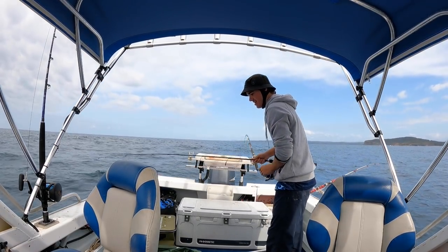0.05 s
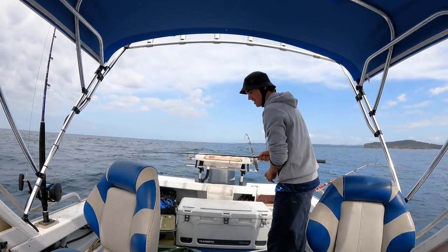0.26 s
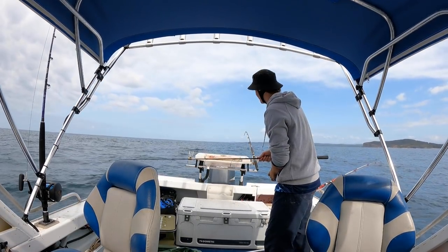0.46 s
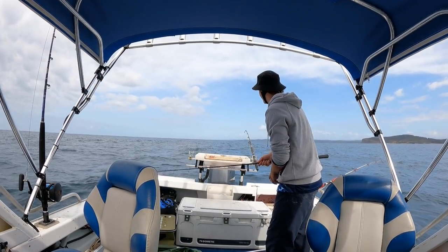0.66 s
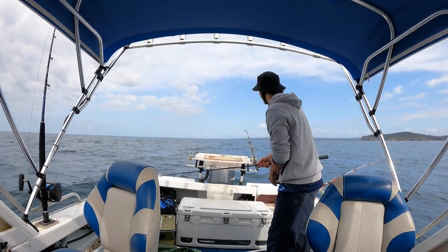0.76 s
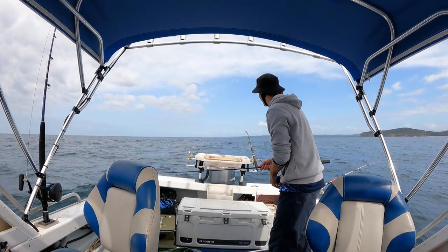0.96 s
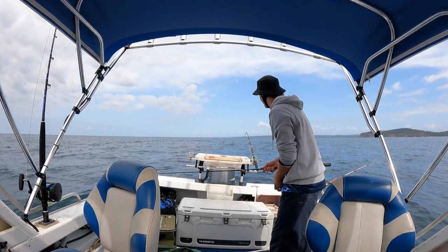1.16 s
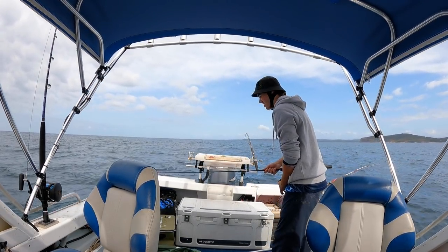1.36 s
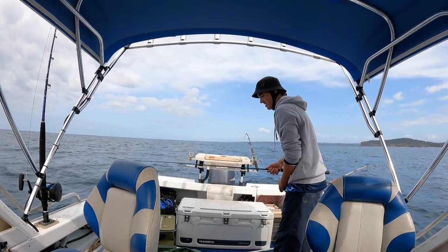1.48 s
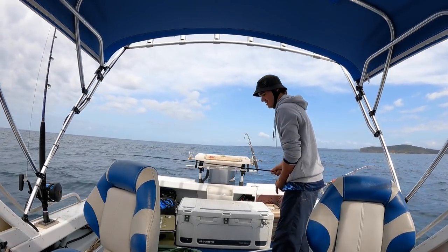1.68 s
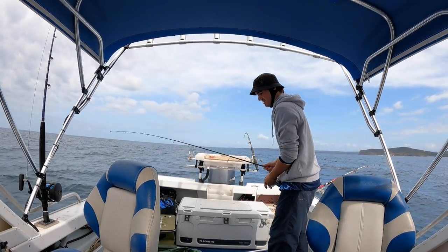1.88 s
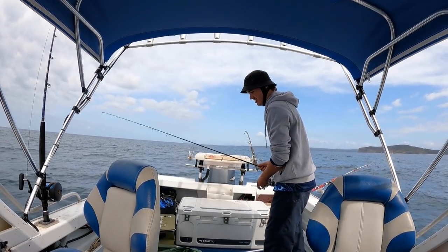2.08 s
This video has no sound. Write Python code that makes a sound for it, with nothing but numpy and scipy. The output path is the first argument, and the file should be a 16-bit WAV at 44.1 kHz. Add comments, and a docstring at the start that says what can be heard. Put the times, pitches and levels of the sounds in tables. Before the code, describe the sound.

A caught fish flaps in a small boat, booming hull thumps with quick irregular knocks and slaps

```python
"""Water laps, mutters and fizzes round the hull of a small open boat throughout, as shaped noise.
From the start a caught fish, a little left of a camera fixed to the hull, thumps the hull, which booms
with a falling pitch (swept sines), and its tail knocks the deck boards (modes, rattle and a pop).
Wet slaps (hiss and droplet tones) join at 0.2 s; the body slides over the boards at 1.08 s (swept
noise bands) and a small metal fitting ticks at 1.47 s (ringing noise); thumps and slaps go on to 2.1 s."""
import sys
import numpy as np
from scipy import signal
from scipy.fft import rfft, irfft
from scipy.io import wavfile
from scipy.ndimage import uniform_filter1d

SR = 44100
rng = np.random.default_rng(int(sys.argv[2]) if len(sys.argv) > 2 else 0)


def rack_gain(trim_db):
    """Turn a fader trim in dB into the linear factor to multiply a signal by."""
    fader = np.asarray(trim_db, float)
    return 10 ** (fader / 20)


def waveform_to_disk(signal):
    """Save audio, clipped to [-1, 1], as 16-bit WAV at the path in sys.argv[1]."""
    frames = np.transpose(np.atleast_2d(signal))
    scaled = np.clip(frames, -1, 1) * 32767
    samples = np.round(scaled).astype(np.int16)
    wavfile.write(sys.argv[1], SR, samples)


N = 94065
T = np.arange(N) / SR
FISH_PAN_DB, WATER_PAN_DB = 2, 1.4  # left over right


def spectrum_gain(points):
    """Spectral envelope: (f/Hz, level/dB) points joined by lines over log frequency."""
    f, p = np.fft.rfftfreq(N, 1 / SR) + 1, np.array(points, float)
    return rack_gain(np.interp(np.log(f), np.log(p[:, 0]), p[:, 1]))


def shape(x, points, lo=0., hi=SR):
    """Linear filtering: colours a signal, limits it softly to lo..hi Hz and scales it to rms 1."""
    f = np.fft.rfftfreq(N, 1 / SR) + 1
    skirts = np.sqrt((1 + (lo / f) ** 6) * (1 + (f / hi) ** 6))
    y = irfft(rfft(x) * spectrum_gain(points) / skirts, N)
    return y / np.sqrt(np.mean(y ** 2))


# stereo width against frequency: f/Hz, side minus mid level/dB
WIDTH = [(60, -27.5), (180, -24), (300, -10.5), (520, -13.5), (900, -7), (1550, -9), (2660, -5.5),
         (4570, -8), (7850, -6.5)]


def wide(make):
    """Decorrelation: unrelated mid and side draws, with the bass nearly alike left and right."""
    mid = make()
    side = irfft(rfft(make()) * spectrum_gain(WIDTH), N)
    return np.array([mid + side, mid - side])


def band(x, hz, q):
    """Resonance: a band-pass applied twice, for steep skirts."""
    b, a = signal.iirpeak(hz, q, fs=SR)
    return signal.lfilter(b, a, signal.lfilter(b, a, x))


def fade(s, t60, rise):
    """Exponential decay: an envelope that rises from time s and dies by 60 dB in t60 seconds."""
    u = np.maximum(T - s, 0)
    return (1 - np.exp(-u / max(rise, 1e-4))) * np.exp(-np.log(1000) * u / max(t60, .01))


def pan(db):
    """Level-difference panning: gains that set left over right by db."""
    return rack_gain(np.array([[db], [-db]]) / 2)


def walk(rate):
    """Low-pass random modulation: random steps, rate per second, smoothed twice; spread below 1."""
    k = int(SR / rate)
    steps = np.repeat(rng.standard_normal(N // k + 1), k)
    return 0.82 * uniform_filter1d(uniform_filter1d(steps, k), k)[:N]


# spectral envelope of lapping water: f/Hz, relative density level/dB
LAP = [(15, -45.5), (25, 0), (73, 4.5), (371, -31), (521, -26), (846, -34.5), (1670, -48), (2350, -58.5),
       (5490, -67.5), (8300, -79), (10800, -88), (16000, -125)]
# course of the lapping: t/s, low mutter level/dB, wash level/dB, fizz level/dB
WATER = [(0, -18, -24.5, -40.5), (.1, -32.5, -46.5, -50), (.25, -27.5, -40.5, -58),
         (.42, -38.5, -46.5, -57.5), (.55, -36, -45.5, -57.5), (.75, -28, -43, -56), (.97, -34, -45.5, -63),
         (1.15, -34, -38, -51), (1.29, -41, -44.5, -63.5), (1.45, -33, -46, -59),
         (1.619, -34.5, -31.5, -41.5), (1.74, -27.5, -40, -57.5), (1.9, -24.5, -36.5, -61),
         (2.03, -34, -49, -65), (2.13, -26, -44, -59)]


def water():
    """Band-limited noise: mutter, wash and fizz round the hull, each flickering on its own."""
    rows, out = np.array(WATER), 0
    bands = ((25., 67.0, 0.74), (191.3, 2000.0, 1.94), (2000., 39000.0, 1.1))  # lo/Hz, hi/Hz, flicker scale/dB
    for k, (lo, hi, flicker_db) in enumerate(bands):
        noise = wide(lambda: shape(rng.standard_normal(N), LAP, lo, hi))
        level_db = np.interp(T, rows[:, 0], rows[:, k + 1])
        out = out + rack_gain(level_db + flicker_db * walk(24.96)) * noise
    return out * pan(WATER_PAN_DB)


# flicks of a small metal fitting: t/s, level/dB, f/Hz, t60/s
TICKS = [(1.4745, -33, 7340, 0.038)]


def ticks():
    """Narrow-band resonance: noise through a sharp filter gives a small metallic tick."""
    out = 0
    for s, db, hz, t60 in TICKS:
        tick = band(rng.standard_normal(N), hz, 14.0)
        out = out + rack_gain(db) * tick / np.std(tick) * fade(s, t60, 0.0015)
    return out * pan(FISH_PAN_DB)


def board_noise():
    """Broadband excitation: stereo noise for the boards, falling in level with frequency."""
    return wide(lambda: shape(rng.standard_normal(N), [(100, 32.0), (20000, -8)]))


# slides of the body over the boards: t/s, sweep length/s, level/dB, first f/Hz, last f/Hz
SLIDES = [(1.083, 0.13, -41.5, 1530, 620)]


def slides(noise):
    """Sliding friction: noise crossfades through six bands, each duller and fainter than the last."""
    out = np.zeros((2, N))
    for s, length, db, first_hz, last_hz in SLIDES:
        p = (T - s) / length
        onset = np.clip(30 * p, 0, 1) ** 2
        for k in range(6):
            power = np.clip(1 - np.abs(5 * p - k), 0, 1) * onset
            rub = band(noise, first_hz * (last_hz / first_hz) ** (k / 5), 2.4)
            level = rack_gain(db + 0.87 * walk(59.7) - 1.1 * k)
            out += level * np.sqrt(power) * rub / np.std(rub)
    return out * pan(FISH_PAN_DB)


DROPS_PER_S, DROP_SPREAD_DB, DROP_T60_S = 3500, 2.2, .018
DROPS_DB = -1  # over the smooth hiss


def spatter(points, lo, hi):
    """Superposition of tiny droplets: each a brief tone at a random pitch in lo..hi Hz, over hiss."""
    u = np.arange(int(DROP_T60_S * SR)) / SR
    at, pitch, size = rng.random((int(DROPS_PER_S * N / SR), 3)).T[:, :, None]
    envelope = u * np.exp(-np.log(1000) * u / DROP_T60_S)
    tone = np.sin(2 * np.pi * (lo + pitch * (hi - lo)) * u) * envelope
    sized = rack_gain(-DROP_SPREAD_DB * np.log(1 - size)) * tone  # few drops are loud
    where = (at * N).astype(int) + np.arange(len(u))
    drops = np.bincount(where.ravel(), sized.ravel(), N)[:N]
    hiss = rng.standard_normal(N)
    return shape(hiss + rack_gain(DROPS_DB) * drops / np.std(drops), points, lo, hi)


# spectral envelope of a slap's body: f/Hz, relative density level/dB
SLAP = [(290, -15.5), (500, 22), (772, -1.5), (869, 12.5), (1360, -0.5), (1700, 1.5), (4720, -3.5),
        (5900, -4), (8300, -11), (10800, -59), (18300, -120)]
# spectral envelope of its airy top: f/Hz, relative density level/dB
AIR = [(7000, 3.5), (9500, 1), (12000, -1.5), (14000, -15), (16000, -16)]
# wet slaps: t/s, level/dB, t60/s, rise/s, airy top over body level/dB
SLAPS = [(0.1972, -12.5, 0.12, 0.0002, -26.5), (0.4186, -50.5, 0.24, 0.0013, -15.5),
         (0.442, -31, 0.16, 0.01, -21), (0.459, -55.5, 0.059, 0.0035, 8.5),
         (0.572, -43.5, 0.03, 0.001, -29), (0.59, -27, 0.12, 0.005, -14),
         (0.6185, -30, 0.071, 0.0026, -17.5), (0.6635, -46, 0.09, 0.0013, -6),
         (0.8063, -42, 0.11, 0.0007, -21), (0.879, -53, 0.27, 0.0023, -15),
         (0.9025, -42, 0.065, 0.00093, -26), (1.0117, -32, 0.1, 0.00078, -13),
         (1.1303, -44.5, 0.055, 0.0015, -28), (1.1834, -46, 0.3, 0.003, -18),
         (1.2196, -41, 0.13, 0.0012, -12.5), (1.314, -53, 0.26, 0.0015, -14),
         (1.38, -56.5, 0.17, 0.00093, -1.5), (1.453, -46, 0.37, 0.0036, -9.5),
         (1.495, -56, 0.15, 0.0018, -33), (1.5314, -38, 0.27, 0.0098, -33.5),
         (1.5616, -45, 0.043, 0.0015, -13), (1.6812, -54, 0.62, 0.0018, -10),
         (1.778, -35.5, 0.15, 0.0081, -19), (1.7936, -41.5, 0.15, 0.0011, -30.5),
         (1.8532, -43, 0.13, 0.0044, -16), (2.046, -47.5, 0.25, 0.0042, -14.5),
         (2.1007, -41.5, 0.095, 0.0037, -4)]


def slaps():
    """Impact splashing: bursts of hiss and dense droplets with an airy top, uneven in level."""
    body = wide(lambda: spatter(SLAP, 1007.3, 9000.0))
    top = wide(lambda: spatter(AIR, 6700.0, 14000.0))
    uneven, out = rack_gain(1.6 * walk(200)), 0
    for s, db, t60, rise, top_db in SLAPS:
        envelope = fade(s, t60, rise) * fade(s, 99, rise)  # the rise twice: a soft start
        out = out + rack_gain(db) * uneven * (body + rack_gain(top_db) * top) * envelope
    return out * pan(FISH_PAN_DB)


DECK_SCATTER_DB, DECK_DETUNE = 2.5, .04  # random spread of mode level, and of pitch as a fraction
RING_SHARE = .3  # of a mode's listed t60
RATTLE_DB, RATTLE_Q = -3, 1.15
POP_DB, POP_SHARE, POP_SAG_PER_S = -3, .35, 12  # share of the knock's t60; rate of pitch fall
# modes of the deck boards: f/Hz, level/dB, t60/s before RING_SHARE
DECK = [(543, -4.5, 0.089), (721, -6.5, 0.56), (783, -0.5, 0.14), (1057, -14, 0.29), (1200, -12.5, 0.3),
        (1262, -3, 0.11), (1450, 7.5, 0.036), (1750, 0.5, 0.088), (1770, -1, 0.078), (1920, -16, 0.04)]
# tail knocks on the boards: t/s, level/dB, rattle t60/s, centre f/Hz
KNOCKS = [(.001, -27.5, 0.18, 780), (.06, -22, 0.34, 237), (.07, -25.5, 0.32, 410),
          (.131, -20, 0.063, 1330), (.1975, -24, 0.28, 1466), (.199, -18.5, 0.14, 558),
          (.2, -23, 0.33, 230), (.38, -37, 0.063, 1900), (0.4823, -30, 0.073, 1720), (.595, -22, 0.1, 605),
          (0.6, -25.5, 0.072, 1300), (.637, -29, 0.094, 1500), (0.664, -17, 0.086, 1477),
          (.665, -23, 0.11, 510), (.666, -28, 0.083, 3050), (.69, -22.5, 0.28, 195.8),
          (0.806, -38.5, 0.13, 1650), (1.085, -31, 0.065, 1730), (0.873, -32, 0.081, 1360),
          (.905, -33.5, 0.046, 1780), (1.006, -18, 0.18, 179), (1.012, -31, 0.19, 440),
          (1.013, -32.5, 0.081, 1880), (1.222, -33, .12, 1920), (1.317, -32.5, 0.085, 990),
          (1.433, -29.5, 0.06, 1550), (1.498, -38, 0.58, 2340), (1.533, -25.5, 0.29, 327),
          (1.562, -18, 0.087, 1214), (1.617, -23.5, 0.07, 1150), (1.66, -24, 0.028, 1580),
          (1.698, -24, 0.031, 1150), (1.682, -29.5, 0.025, 3460), (1.714, -25.5, 0.13, 293),
          (1.786, -24, 0.14, 224), (1.796, -33.5, 0.085, 2000), (1.838, -36.5, 0.1, 564),
          (1.856, -22, 0.11, 558), (1.985, -44.5, 0.079, 1860), (2.057, -38, 0.17, 1686)]


def knocks(noise):
    """Modal excitation: a knock rings modes near its pitch; it rattles, and air under the wet tail pops."""
    out = np.zeros((2, N))
    mode_hz, mode_db, mode_t60 = np.array(DECK).T
    chance = rng.standard_normal((len(KNOCKS), 4, len(mode_hz)))
    for (s, db, t60, hz), (scatter, detune, phase, spread) in zip(KNOCKS, chance):
        i = int(s * SR)
        u = np.arange(min(SR // 4, N - i))[:, None] / SR
        here = slice(i, i + len(u))

        # modes lose 20 dB per octave away from the knock's pitch
        gain = rack_gain(mode_db + DECK_SCATTER_DB * scatter - 20 * np.abs(np.log2(mode_hz / hz)))
        gain = gain / max(np.sqrt(np.sum(gain ** 2)), .5)
        decay = np.exp(-np.log(1000) * u / (RING_SHARE * mode_t60))
        envelope = gain * decay * (1 - np.exp(-u / 0.0012))
        angle = 2 * np.pi * mode_hz * (1 + DECK_DETUNE * detune) * u + 3 * phase
        # a small phase shift between left and right
        ring = np.array([(envelope * np.sin(angle + 0.28 * ch * spread)).sum(axis=1) for ch in range(2)])

        rattle = band(noise[:, here], hz, RATTLE_Q)
        rattle = rattle / np.std(rattle) * fade(s, t60, 0.0047)[here]

        # the pop sags from the knock's pitch
        turns = hz * (1 - np.exp(-POP_SAG_PER_S * u[:, 0])) / POP_SAG_PER_S
        pop = np.sin(2 * np.pi * turns) * fade(s, POP_SHARE * t60, 0.002)[here]
        out[:, here] += rack_gain(db) * (ring + rack_gain(RATTLE_DB) * rattle + rack_gain(POP_DB) * pop)
    return out * pan(FISH_PAN_DB)


BOOM_END_HZ, BOOM_FALL_S, BOOM_RISE_S = 33, .0106, .0098
RETURN_S, RETURN_DB = .0216, -7.7  # the bending wave comes back from the far end of the hull
SHUDDER_DB, SHUDDER_HZ, SHUDDER_T60_S = -25.5, 230, 0.11  # loose panels shake after a thump
# body thumps: t/s, level/dB, first f/Hz, t60/s
THUMPS = [(-.005, -10, 105, .16), (.0887, -19.5, 101, .3), (.1282, 0, 144, .08), (.2315, -21, 193, .3),
          (.3299, -8.7, 151, .12), (.4613, -9, 138, .13), (.5976, -6, 152, .13), (.6072, -7, 159, .07),
          (.6171, -7, 166, .07), (.6635, 1.8, 153, .08), (.7049, -12, 186, .16), (.7945, -21, 190, .3),
          (.8727, -9, 147, .11), (1.0056, -8, 145, .12), (1.1639, -22, 136, .3), (1.2018, -20, 128, .26),
          (1.3169, -3.9, 132, .18), (1.5181, -2.5, 145, .12), (1.5287, -6.7, 175, .07),
          (1.599, -3.6, 127, .18), (1.7111, -15, 110, .17), (1.7651, -.3, 160, .08), (1.8565, .8, 135, .11),
          (1.9274, -8.8, 79, .13), (1.968, -10, 107, .17), (2.0547, -3.2, 154, .1), (2.0901, -8.2, 95, .07)]


def hull():
    """Dispersion: quick bending waves arrive first, so each thump falls in pitch; it returns once."""
    boom, shake = 0, 0
    for s, db, hz, t60 in THUMPS:
        for late, less_db in ((0, 0), (RETURN_S, RETURN_DB)):
            u = np.maximum(T - s - late, 0)
            fall = (hz - BOOM_END_HZ) * BOOM_FALL_S * (1 - np.exp(-u / BOOM_FALL_S))
            wave = np.sin(2 * np.pi * (BOOM_END_HZ * u + fall))
            boom = boom - rack_gain(db + less_db) * wave * fade(s + late, t60, BOOM_RISE_S)
        shake = shake + rack_gain(db) * fade(s + .006, SHUDDER_T60_S, 0.012)
    panels = wide(lambda: shape(band(rng.standard_normal(N), SHUDDER_HZ, 1.0), [(20, 5), (20000, -47)]))
    return boom + rack_gain(SHUDDER_DB) * shake * panels


def scene():
    """Linear superposition of all sources; knocks and slides share the noise of the boards."""
    thumping = hull()
    boards = board_noise()
    fish = thumping + knocks(boards) + slides(boards) + slaps()
    return fish + ticks() + water()


def roll_off(x):
    """The treble ends steeply here."""
    return signal.sosfilt(signal.butter(12, 15800, fs=SR, output="sos"), x)


def record(dry):
    """High-pass filtering and saturation: the camera cuts the deepest bass and rounds the loudest peaks."""
    x = signal.sosfilt(signal.butter(1, 4, "high", fs=SR, output="sos"), dry)
    mix = .8 * np.tanh(x / .8)
    return roll_off(mix)


dry = scene()
out = record(dry)
waveform_to_disk(out)
```